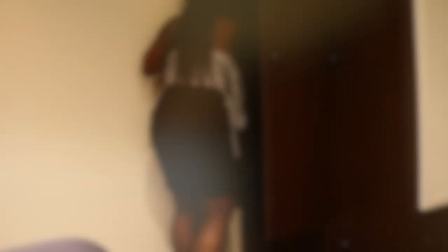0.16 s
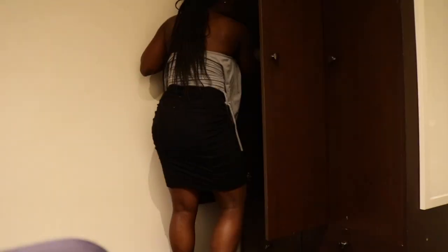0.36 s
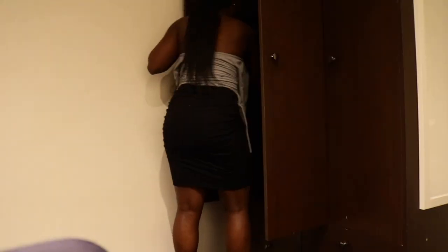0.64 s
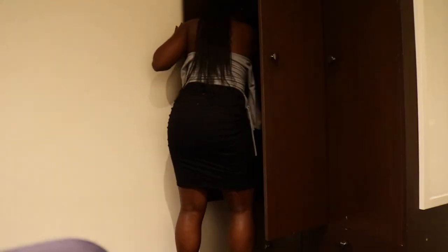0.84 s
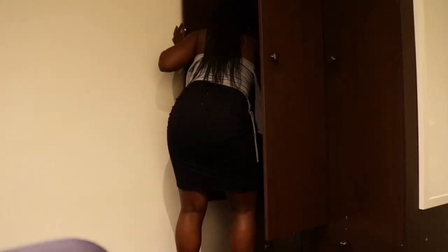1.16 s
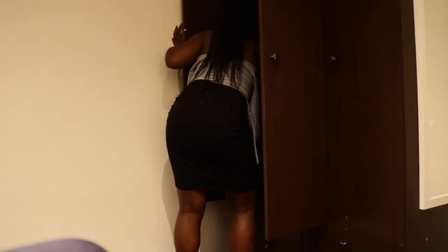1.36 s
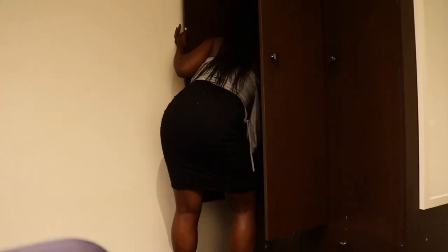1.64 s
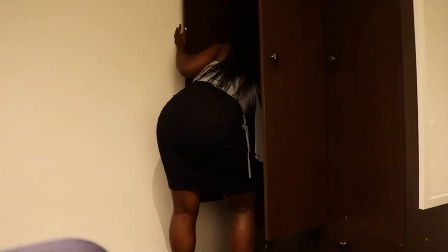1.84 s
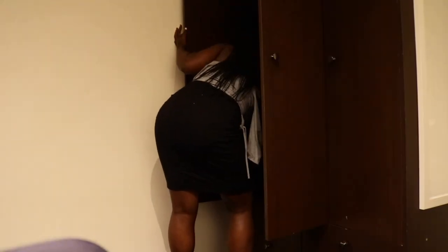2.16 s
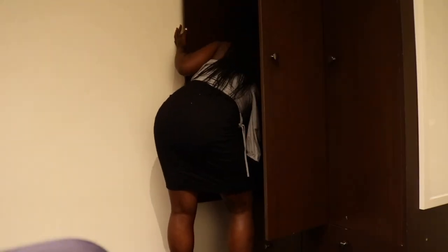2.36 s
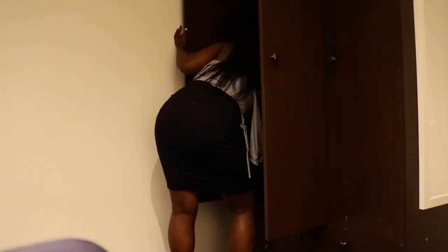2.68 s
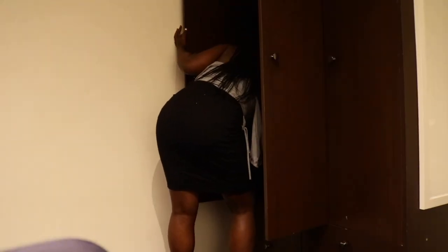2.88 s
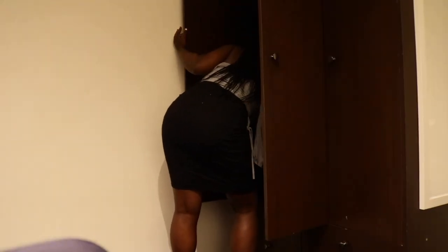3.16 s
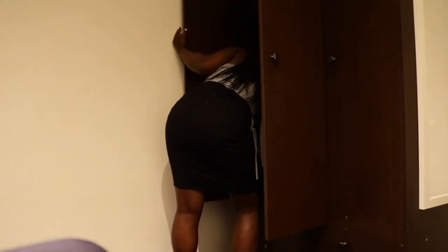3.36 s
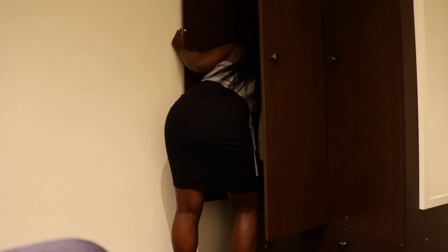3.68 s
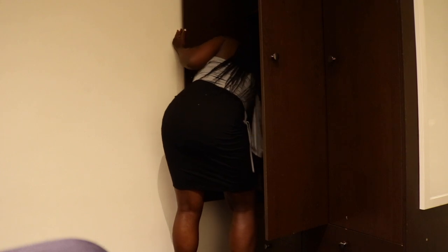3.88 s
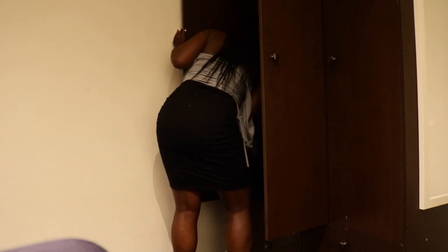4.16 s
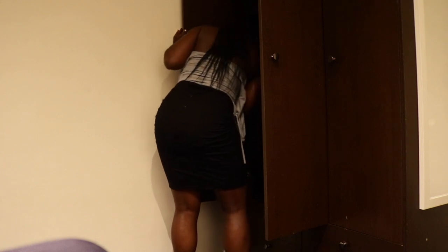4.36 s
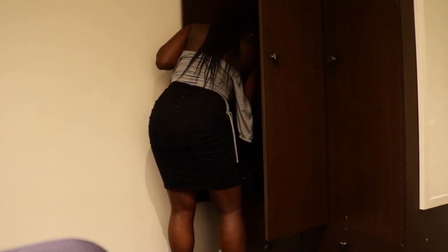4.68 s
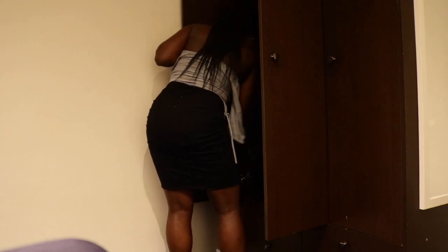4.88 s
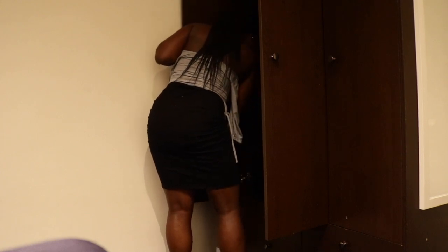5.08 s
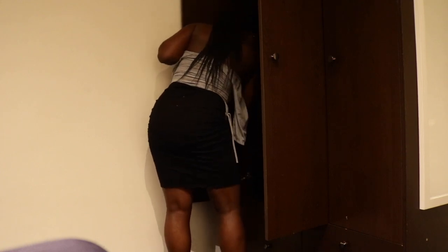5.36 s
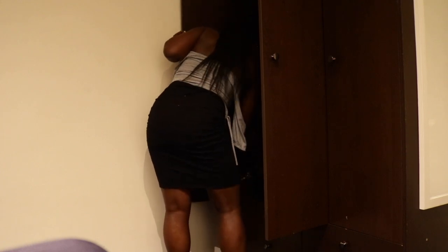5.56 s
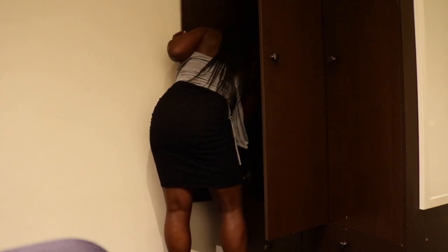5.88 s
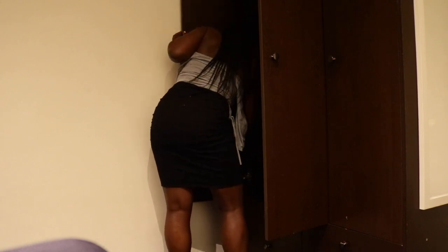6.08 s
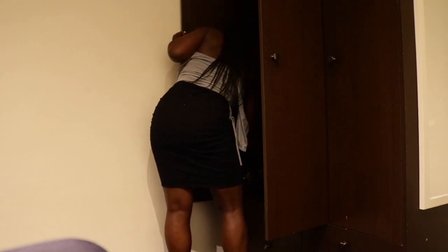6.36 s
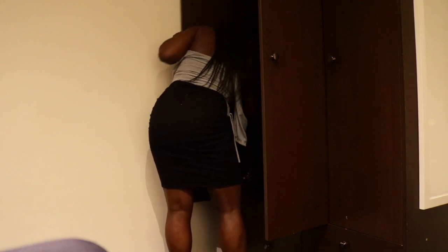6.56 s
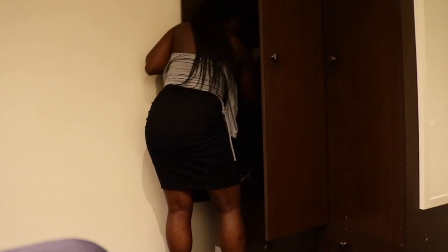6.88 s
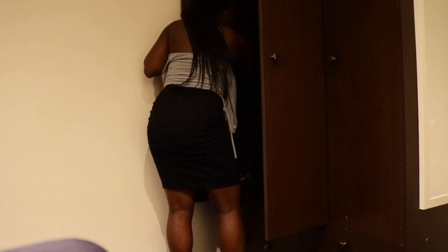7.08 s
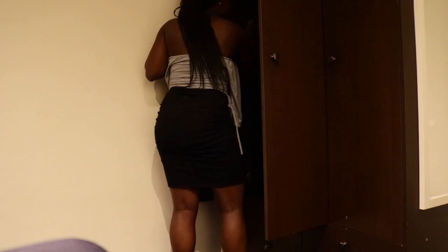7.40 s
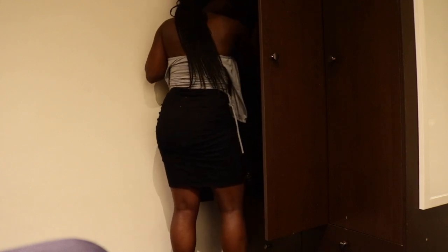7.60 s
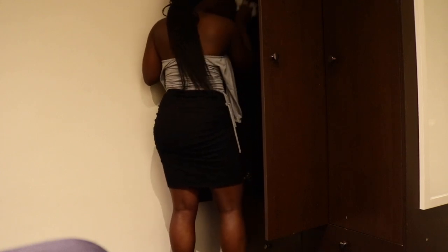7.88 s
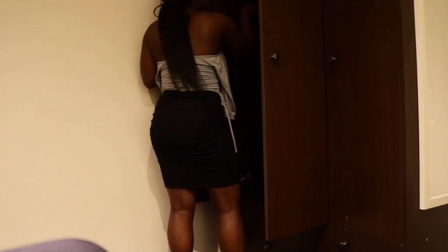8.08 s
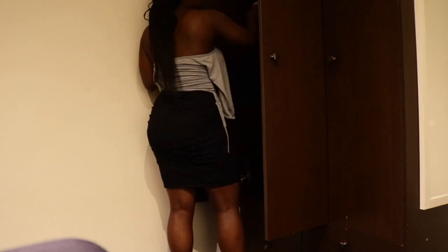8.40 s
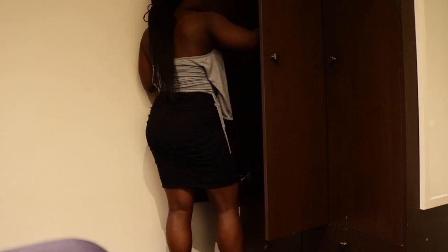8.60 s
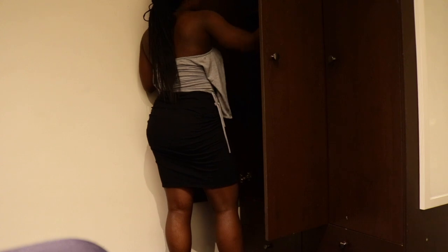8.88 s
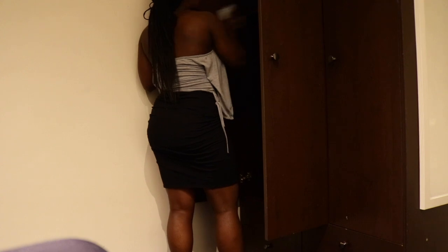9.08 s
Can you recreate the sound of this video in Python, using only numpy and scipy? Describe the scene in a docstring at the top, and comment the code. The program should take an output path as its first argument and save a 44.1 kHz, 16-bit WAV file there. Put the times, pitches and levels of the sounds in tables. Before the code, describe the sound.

Someone wipes a hollow wooden wardrobe in uneven strokes, knocking shelves softly; the cloth squeaks briefly, and later a fitting snaps against the wood.

```python
"""A quiet bedroom, microphones a few steps from a wooden wardrobe that someone wipes inside with a dry cloth.
From the start the cloth swishes to and fro: noise follows the hand's speed while bumps ring shelves and panels.
Before two seconds the cloth sticks and squeaks, a rising tone over juddering slips.
Just after four seconds a hard fitting clacks, noise bursts through short resonances; wiping and bumps go on.
Throughout lie a faint mains hum, a sine, and the noise of still air and microphone hiss."""
import sys
import numpy as np
from scipy import signal
from scipy.fft import rfft, irfft
from scipy.io import wavfile
from scipy.ndimage import uniform_filter1d

SR = 44100
rng = np.random.default_rng(int(sys.argv[2]) if len(sys.argv) > 2 else 0)


def materialize(psi):
    """Save the field psi as 16-bit PCM at rate SR to the path in sys.argv[1].

    A 1-D psi becomes a single channel; in a 2-D psi each row is a channel.
    """
    bounded = np.clip(np.atleast_2d(psi).T, -1, 1)
    quanta = np.round(bounded * 32767).astype(np.int16)
    wavfile.write(sys.argv[1], SR, quanta)


N = 407484

# spectrum of the rubbed panel: pitch_hz, level_db (per Hz)
RUB_SPECTRUM = [(90, 5), (200, 6), (330, -1), (440, -3.5), (700, -2), (1150, -4.5), (1800, -3), (3500, 0.5),
                (5000, -4), (6200, -5.5), (7200, -14.5), (10000, -23)]
# spectrum of the hissing fibres: pitch_hz, level_db (per Hz)
FIBRE_SPECTRUM = [(5500, 4.5), (7500, -2), (9000, -2), (11200, -1.5), (13500, -4.5), (16000, -7)]
# hollow resonances of the wardrobe under the cloth: pitch_hz, width_hz, level_db (relative to the rub)
HOLLOW_RESONANCES = [(237, 62, -9), (276, 25, 1.5), (461, 26, 9.5), (1150, 260, -0.5), (2680, 320, -18),
                     (5700, 620, -33.5)]


def cloth(flutter_db=0.61, drag_db=-11, rub_trim_db=-1.77, fibre_trim_db=1.63):
    """Strokes drive the panel and its hollow; the fibres hiss, and drag makes the wood mutter."""
    rub_db, fibre_db = wiping()
    panel = coloured(friction(grain_db=3.5), RUB_SPECTRUM)
    hollow = sum(from_db(db) * resonate(panel, hz, width_hz) for hz, width_hz, db in HOLLOW_RESONANCES)
    rub = panel + hollow
    rub /= np.std(band(rub, 2000, 7000))  # the rub level counts in this band
    drag = from_db(drag_db) * coloured(rng.standard_normal(N), SHUDDER_SPECTRUM)
    wood = from_db(rub_db + rub_trim_db) * (rub + drag)
    fibres = from_db(fibre_db + fibre_trim_db) * coloured(friction(grain_db=0), FIBRE_SPECTRUM)
    flutter = from_db(flutter_db * drift(45))
    return flutter * (wood + fibres)


# sweeps of the cloth, speeding up and slowing to the turn; levels are before pressing and the trims in cloth():
# start_s, rise_s, fall_s, rub_level_db, fibre_level_db
CLOTH_STROKES = [(0.04, 0.14, 0.3, -49, -55.5), (0.36, .12, 0.27, -48.5, -53.5),
                 (0.69, 0.1, 0.093, -47.5, -52.5), (0.879, 0.075, .17, -48, -53),
                 (1.06, 0.15, 0.074, -47.5, -51.5), (1.299, 0.02, 0.12, -40, -45.5),
                 (1.38, 0.079, 0.16, -49, -54.5), (1.6, 0.077, 0.062, -49.5, -51.5),
                 (1.68, 0.023, .48, -45, -48.5), (2.15, 0.23, 0.19, -48, -51),
                 (2.57, 0.1, 0.24, -46, -51.5), (2.9, 0.11, 0.24, -47.5, -51.5),
                 (3.24, 0.16, 0.21, -47, -51), (3.568, 0.19, 0.23, -48, -56), (4.0, 0.12, 0.17, -45.5, -56),
                 (4.19, 0.23, 0.25, -53, -55), (4.67, 0.25, 0.08, -51.5, -55), (5.0, 0.1, 0.24, -49.5, -54),
                 (5.32, 0.35, 0.059, -51, -54), (5.72, .24, .08, -49.5, -54), (6.04, 0.2, 0.11, -49.5, -55),
                 (6.37, 0.16, 0.55, -51, -56), (6.89, 0.091, 0.17, -55.5, -56),
                 (7.1, 0.27, 0.081, -52, -54), (7.42, .06, .13, -49.5, -54),
                 (7.64, 0.076, .1, -52.5, -56.5), (8.09, .12, 0.06, -51, -57.5),
                 (8.378, 0.25, 0.22, -45.5, -51), (8.878, .15, 0.065, -45.5, -53),
                 (9.17, .04, .2, -51.5, -57)]
# the hand bears down harder within a stroke: centre_s, length_s, extra_rub_db
HAND_PRESSES = [(0.338, .05, 7.5), (0.582, 0.11, 11), (1.88, 0.095, 2.5), (2.36, 0.092, 5), (3.864, .06, 6),
                (4.045, 0.096, 6.5), (4.515, 0.071, 7.5)]
# the cloth never lies quite still
RESTING_RUB_DB, RESTING_FIBRE_DB = -58, -67


def wiping(speed_law=0.83, fibre_share=0.5):
    """Rub and fibre levels in dB: their power follows the hand's speed, and pressing raises the rub most."""
    rub_power, fibre_power = from_db(RESTING_RUB_DB) ** 2, from_db(RESTING_FIBRE_DB) ** 2
    for start_s, rise_s, fall_s, rub_db, fibre_db in CLOTH_STROKES:
        speed = np.sin(np.pi / 2 * ramp(start_s, rise_s, 0, fall_s))
        stroke = speed ** speed_law
        rub_power = rub_power + stroke * from_db(rub_db) ** 2
        fibre_power = fibre_power + stroke * from_db(fibre_db) ** 2
    t = np.arange(N) / SR
    pressure_db = sum(db * np.exp(-(2 * (t - s) / length_s) ** 2) for s, length_s, db in HAND_PRESSES)
    rub_db = 10 * np.log10(rub_power) + pressure_db
    fibre_db = 10 * np.log10(fibre_power) + fibre_share * pressure_db
    return rub_db, fibre_db


# brief thin scrapes where the cloth catches: start_s, length_s, pitch_hz, width_hz, level_db
CLOTH_SCRAPES = [(3.727, 0.099, 990, 300, -47.5), (3.742, 0.091, 3800, 550, -49.5),
                 (3.923, 0.07, 1570, 596, -47.5), (4.042, 0.023, 1102, 350, -40),
                 (4.737, .02, 4700, 150, -52), (7.264, .055, 3530, 70, -48)]


def scrapes():
    """Friction narrows to a rough note for a moment."""
    grains = friction(grain_db=3.0)
    out = np.zeros(N)
    for start_s, length_s, hz, width_hz, db in CLOTH_SCRAPES:
        note = resonate(resonate(grains, hz, width_hz), hz, width_hz)
        out += from_db(db) * swell(start_s, length_s) * rms_one(note)
    return out


# spectrum of the judder: pitch_hz, level_db (per Hz)
JUDDER_SPECTRUM = [(120, -19), (220, -8), (360, -1.5), (490, -3.5), (750, -7), (1200, -5.5), (1700, -10),
                   (3000, -12.5), (6000, -23)]


def squeak(waver=0.01, overtone_db=-25, slips_per_s=900, panel_db=4, panel_width_hz=22, grip_db=2.2):
    """Stick-slip sings on a rising note while coarser, uneven slips judder the panel."""
    hz, squeak_gain, judder_gain = sticking()
    phase = 2 * np.pi * np.cumsum(hz * (1 + waver * drift(300))) / SR
    grip = from_db(grip_db * drift(220))
    tone = np.sin(phase) + from_db(overtone_db) * np.sin(2 * phase)
    note = rms_one(tone) * squeak_gain * grip
    slips = random_slips(slips_per_s)
    panel = sum(resonate(slips, mode_hz, panel_width_hz) for mode_hz, _, _ in PANEL_MODES)
    judder = coloured(slips + from_db(panel_db) * panel, JUDDER_SPECTRUM) * judder_gain
    return bedroom(note + judder, wet_db=-9, t60=.45)


# the cloth sticks and slips: the note climbs and settles as the hand gains speed
SQUEAK_START_S, SQUEAK_LENGTH_S, SQUEAK_EDGE_S = 1.675, 0.26, 0.0086
SQUEAK_FROM_HZ, SQUEAK_TO_HZ, SQUEAK_GLIDE_S = 830, 1201, .06
SQUEAK_DB, JUDDER_DB = -42.5, -38  # before the bite
# once it bites harder: the note swells and dies back, and the judder follows a little later
BITE_AT_S, BITE_RISE_S, BITE_HOLD_S, BITE_FALL_S = 1.815, 0.019, 0.021, 0.056
BITE_SQUEAK_DB, BITE_JUDDER_DB, JUDDER_LAG_S = 14, 7.5, .018  # the levels are added to those above


def sticking():
    """Pitch, squeak gain and judder gain while the cloth sticks."""
    since_s = np.maximum(np.arange(N) / SR - SQUEAK_START_S, 0)
    hz = SQUEAK_TO_HZ + (SQUEAK_FROM_HZ - SQUEAK_TO_HZ) * np.exp(-since_s / SQUEAK_GLIDE_S)
    stuck = ramp(SQUEAK_START_S, SQUEAK_EDGE_S, SQUEAK_LENGTH_S - 2 * SQUEAK_EDGE_S, SQUEAK_EDGE_S)
    bite = ramp(BITE_AT_S, BITE_RISE_S, BITE_HOLD_S, BITE_FALL_S)
    late_bite = ramp(BITE_AT_S + JUDDER_LAG_S, BITE_RISE_S, BITE_HOLD_S, BITE_FALL_S)
    squeak_gain = stuck * from_db(SQUEAK_DB + BITE_SQUEAK_DB * bite)
    judder_gain = stuck * from_db(JUDDER_DB + BITE_JUDDER_DB * late_bite)
    return hz, squeak_gain, judder_gain


# a panel shudders while the hand leans and drags on it: start_s, length_s, level_db
PANEL_SHUDDERS = [(0.045, 0.17, -38), (0.48, 0.062, -54), (1.035, 0.3, -43.5), (3.863, 0.14, -41),
                  (4.014, 0.16, -34.5), (4.637, 0.41, -56.5), (6.2, .13, -47.5), (8.018, 0.49, -45.5)]
# spectrum of the shudder and of the drag under the cloth: pitch_hz, level_db (per Hz)
SHUDDER_SPECTRUM = [(85, -2.5), (110, 1.5), (160, -3.5), (210, -4), (280, -6), (380, -36), (600, -39)]


def shudders(slips_per_s=220):
    """Slow heavy slips keep a panel rumbling."""
    slips = random_slips(slips_per_s)
    rumble = coloured(bedroom(slips, wet_db=4, t60=0.15), SHUDDER_SPECTRUM)
    return rumble * sum(from_db(db) * swell(start_s, length_s) for start_s, length_s, db in PANEL_SHUDDERS)


# bumps on shelves and panels; treble_loss_db is what a soft contact swallows:
# start_s, strength_db, pitch_hz (of the board), treble_loss_db, early_t60_s
BUMPS = [(0.046, -35.5, 197, 19.5, .35), (0.126, -32.5, 228, 15.5, .4), (0.178, -28, 320, 32, 0.24),
         (0.296, -34.5, 245, 36, 0.21), (0.439, -27, 199, 22, 0.15), (0.474, -34, 120, 28, .22),
         (0.762, -33, 141, 35, 0.16), (0.799, -18, 196, 35, 0.4), (1.043, -31.5, 165, 35, 0.16),
         (1.111, -33, 170, 40, 0.24), (2.591, -28.5, 220, 8, 0.17), (2.885, -32.5, 223, 13, 0.21),
         (3.343, -27, 257, 17.5, 0.2), (3.444, -43.5, 600, 8, 0.3), (3.592, -36.5, 200, 13.5, 0.28),
         (3.879, -39, 119, 10, 0.42), (4.046, -36, 180, 8, 0.7), (4.104, -30.5, 210, 28, 0.37),
         (4.2, -43, 1000, 35, 0.13), (4.601, -42, 940, 32, 0.16), (4.61, -42.5, 201, 22, .17),
         (5.122, -35.5, 243, 19.5, 0.26), (6.83, -31, 213, 14, 0.22), (7.247, -39.5, 225, 24.5, .22),
         (7.549, -31, 246, 8.5, 0.24), (7.635, -33.5, 180, 29, 0.21), (7.854, -24, 191, 25.5, 0.27),
         (8.066, -34.5, 118, 30, .26), (8.231, -33, 170, 23, 0.17), (8.26, -38, 160, 11, 0.21),
         (8.407, -36, 185, 10.5, 0.25), (9.188, -25.5, 268, 31.5, .25)]
# octave bands of a bump: centre_hz, level_db (relative), tail_t60_s
BUMP_OCTAVES = [(60, 2, 0.73), (123.3, -0.5, 1), (250.4, 0, 1), (489, 1.5, 1), (1025, 0.5, 0.62),
                (2070, 0.5, 0.2), (3500, -3.5, 0.11), (7600, -16, 0.18)]
# modes of the panels, before each bump's tuning: pitch_hz, level_db (relative), t60_s
PANEL_MODES = [(110.6, -5, 0.44), (159.1, -1, 0.27), (187.7, -5, 0.19), (215.7, -0.5, 0.166),
               (263.3, 0.5, 0.24), (367.4, -5.5, 0.25), (424.8, -5.5, 0.37), (485, -5, 0.18),
               (564.7, -4.5, 0.22), (654, -11.5, 0.19), (741, -13, 0.25), (832.5, -16, 0.27),
               (1173, -10.5, 0.13), (2220, -13, 0.18), (2670, -27, 0.19)]
# higher than BODY_HZ the ring builds faster; above CUSHION_HZ the push is softened
BODY_HZ, CUSHION_HZ = 240, 473


def knocks(scatter_db=6, tail_db=-17, build_s=0.0039, push_db=-3, push_s=0.00329):
    """Each bump pushes a panel, rings it and rattles round the wardrobe; harder contacts keep more treble."""
    out, t = np.zeros(N), np.arange(SR * 3 // 5) / SR
    push = np.exp(-np.abs(t - push_s) / .0004)
    for start_s, strength_db, pitch_hz, soft_db, early_t60 in BUMPS:
        # no two boards are tuned alike
        tuning = rng.uniform(.96, 1.04)
        ring = struck(PANEL_MODES, t * tuning, spread_db=2.0)
        for k, (hz, octave_db, tail_t60) in enumerate(BUMP_OCTAVES):
            dying = fade(t, max(early_t60, .03)) + from_db(tail_db) * fade(t, tail_t60)
            scatter = from_db(scatter_db) * rng.standard_normal(len(t)) * dying
            # bending waves spread faster the higher they are: the tick leads, the body follows
            build = 1 - np.exp(-t / build_s * np.sqrt(hz / BODY_HZ))
            signed_push = push * (-1) ** k
            body = build * (ring + scatter)
            first, after = band([signed_push, body], hz / np.sqrt(2), hz * np.sqrt(2), order=3)
            cushion = min(1, CUSHION_HZ / hz)  # the padded hand softens the push in the treble
            hit = from_db(push_db) * cushion * peak_one(first) + peak_one(after)
            db = strength_db + octave_db + bump_db(hz, pitch_hz, soft_db)
            add(out, start_s, from_db(db) * peak_one(hit))
    return out


# a board radiates little below its pitch; above it the treble loss sets in over some octaves
BASS_LOSS_DB_PER_OCTAVE, SOFTENING_OCTAVES = 13, 2.39


def bump_db(hz, pitch_hz, soft_db):
    """A bump is strongest at the board's pitch; the softer the contact, the less treble."""
    octaves = np.log2(hz / pitch_hz)
    bass_db = BASS_LOSS_DB_PER_OCTAVE * min(octaves, 0)
    treble_db = -soft_db * np.tanh(max(octaves, 0) / SOFTENING_OCTAVES)
    return bass_db + treble_db


# a hard fitting snaps against the wood and rebounds: start_s, level_db (before the room)
FITTING_CLACKS = [(4.104, -27), (4.108, -23), (4.127, -34.5)]
# resonances of the fitting and the wood behind it: pitch_hz, width_hz, level_db (relative)
FITTING_RESONANCES = [(1160, 120, -14), (1270, 300, 4.5), (2010, 490, -12), (2970, 73, 7), (3250, 280, -5),
                      (5430, 320, -7.5), (6270, 180, 9), (6300, 160, -11)]


def fitting(crack_db=-15, crack_t60=0.057, splash_db=-29):
    """A sharp crack through short, damped resonances, with a brief splash of treble."""
    out, t = np.zeros(N), np.arange(SR // 4) / SR
    for start_s, clack_db in FITTING_CLACKS:
        burst = rng.standard_normal(len(t)) * fade(t, crack_t60)
        ring = sum(from_db(db) * resonate(burst, hz, width_hz) for hz, width_hz, db in FITTING_RESONANCES)
        body = band(ring + from_db(crack_db) * burst, 1060, 5230, order=4)
        splash = from_db(splash_db) * band(burst, 9600, 12000, order=1)
        add(out, start_s, from_db(clack_db) * peak_one(body + splash))
    return bedroom(out, wet_db=-5.5, t60=0.21)


# spectrum of the still room: pitch_hz, level_db (per Hz)
AIR_SPECTRUM = [(25, -5), (60, -6), (120, -11), (250, -12), (600, -13), (1500, -18.5), (5000, -30.5),
                (16000, -31)]
# spectrum of the microphones' hiss: pitch_hz, level_db (per Hz)
HISS_SPECTRUM = [(300, 9.5), (3500, -22), (7000, -1), (18000, 4)]
AIR_DB, HISS_DB, HUM_DB, HUM_HZ = -55, -60.5, -52.5, 50.5


def background():
    """Mains hum and still air reach both microphones alike; each microphone adds its own hiss."""
    hum = from_db(HUM_DB) * rms_one(np.sin(2 * np.pi * HUM_HZ * np.arange(N) / SR))
    air = from_db(AIR_DB) * coloured(rng.standard_normal(N), AIR_SPECTRUM)
    hiss = from_db(HISS_DB) * coloured(rng.standard_normal((2, N)), HISS_SPECTRUM)
    return hum + air + hiss


def friction(grain_db):
    """Countless fibres catch and let go, each with a force of its own."""
    return rng.standard_normal(N) * from_db(grain_db * rng.standard_normal(N))


def random_slips(slips_per_s):
    """Single jerks at chance moments, either way."""
    return (rng.random(N) < slips_per_s / SR) * rng.choice([-1, 1], N)


def struck(modes, t, spread_db):
    """A blow rings every mode with a strength and sign set by where it lands."""
    hz, db, t60 = np.transpose(modes)[:, :, None]
    strength = from_db(db + spread_db * rng.standard_normal(hz.shape)) * rng.choice([-1, 1], hz.shape)
    return np.sum(strength * np.sin(2 * np.pi * hz * t) * fade(t, t60), axis=0)


def bedroom(x, wet_db, t60):
    """Direct sound plus dense, dull reflections from the wardrobe and the walls."""
    t = np.arange(SR // 2) / SR
    echoes = band(rng.standard_normal(len(t)), 79, 7100, order=1) * fade(t, t60) * (t > .002)
    echoes *= from_db(wet_db) / np.linalg.norm(echoes)
    reflected = signal.fftconvolve(x, echoes)[:len(x)]
    return (x + reflected) / np.sqrt(1 + from_db(wet_db) ** 2)


def resonate(x, hz, width_hz):
    """One resonance with gain 1 on top."""
    r = np.exp(-np.pi * width_hz / SR)
    zeros = np.array([1, 0, -1]) * (1 - r * r) / 2
    poles = [1, -2 * r * np.cos(2 * np.pi * hz / SR), r * r]
    return signal.lfilter(zeros, poles, x)


def coloured(x, spectrum):
    """Give a steady excitation a smooth spectrum that falls away beyond its ends; rms 1."""
    hz, db = np.transpose(spectrum)
    f = np.maximum(np.fft.rfftfreq(N, 1 / SR), 1)
    skirts = 1 / np.sqrt((1 + (hz[0] / f) ** 6) * (1 + (f / hz[-1]) ** 12))
    curve = from_db(np.interp(np.log(f), np.log(hz), db))
    return rms_one(irfft(rfft(x) * skirts * curve, N))


def band(x, low_hz, high_hz, order=2):
    """Causal band-pass."""
    sos = signal.butter(order, [low_hz, min(high_hz, SR / 2 - 1)], "band", fs=SR, output="sos")
    return signal.sosfilt(sos, x)


def drift(rate):
    """Smooth chance with rms 1, `rate` turning points a second."""
    knots = rng.standard_normal(int(N / SR * rate) + 2)
    return rms_one(np.interp(np.arange(N) / SR * rate, np.arange(len(knots)), knots))


def ramp(start, rise, hold, fall):
    """Attack, hold and release between 0 and 1."""
    return np.interp(np.arange(N) / SR, start + np.cumsum([0, rise, hold, fall]), [0, 1, 1, 0])


def swell(start, length):
    """A rounded rise and fall."""
    return np.sqrt(np.sin(np.pi * np.clip((np.arange(N) / SR - start) / length, 0, 1)))


def fade(t, t60):
    """A decay of 60 dB in t60 seconds."""
    return np.exp(-np.log(1000) * t / t60)


def from_db(db):
    """Decibels to gain."""
    return 10 ** (np.asarray(db) / 20)


def rms_one(x):
    """Scale to rms 1."""
    return x / np.sqrt(np.mean(x ** 2) + 1e-20)


def peak_one(x):
    """Scale a hit so that its loudest 20 ms have rms 1."""
    return x / np.sqrt(uniform_filter1d(x ** 2, SR // 50).max())


def add(out, s, sound):
    """Mix a sound in at time s."""
    start = max(round(s * SR), 0)
    out[start:start + len(sound)] += sound[:max(N - start, 0)]


def scene():
    """The wardrobe stands straight ahead, alike in both channels."""
    return cloth() + scrapes() + squeak() + shudders() + knocks() + fitting() + background()


def record(dry):
    """The microphones' top is cut steeply."""
    cutoff_hz = 15800
    return signal.sosfilt(signal.ellip(12, .1, 80, cutoff_hz, fs=SR, output="sos"), dry)


dry = scene()
out = record(dry)
materialize(out)
```